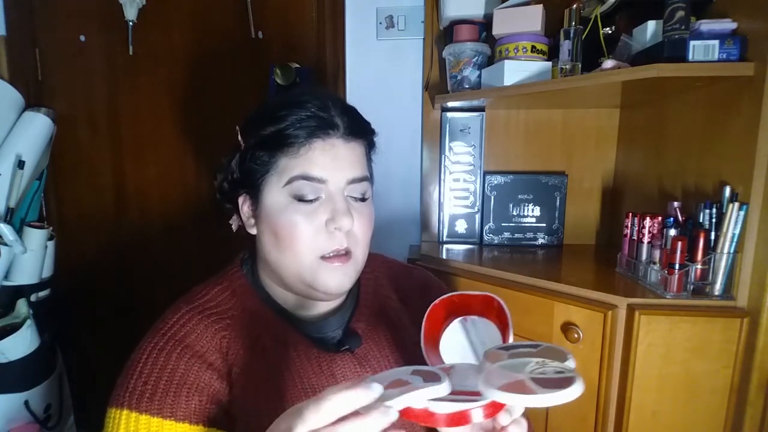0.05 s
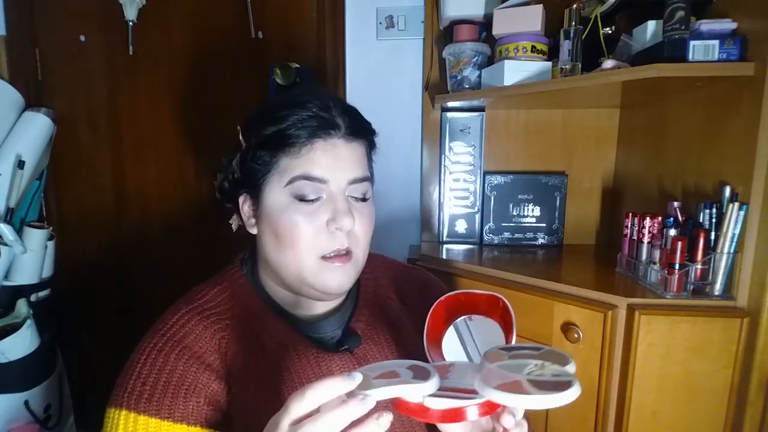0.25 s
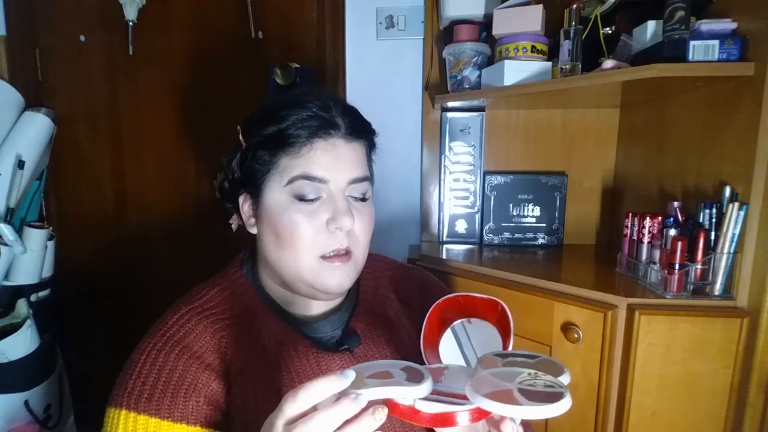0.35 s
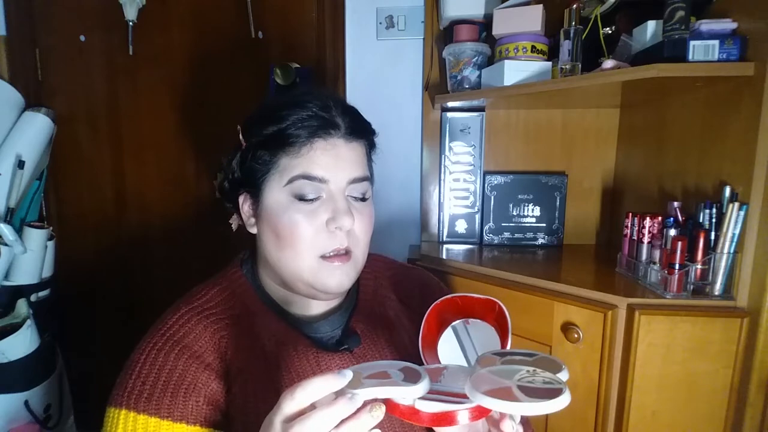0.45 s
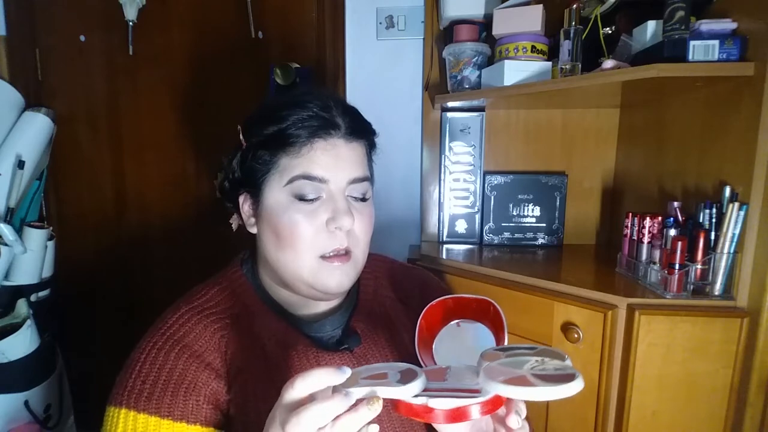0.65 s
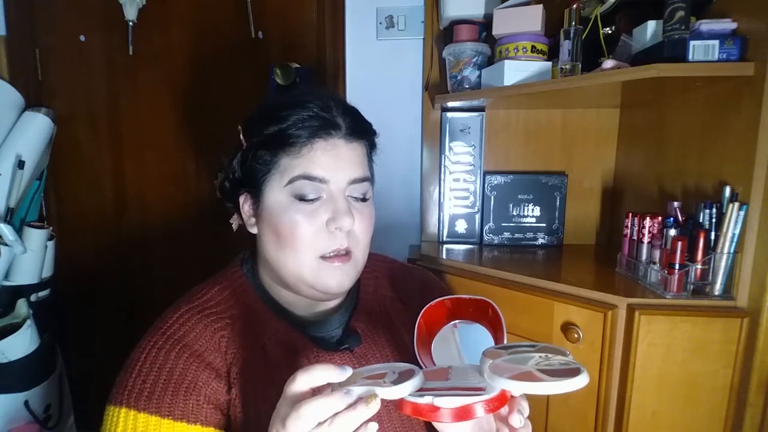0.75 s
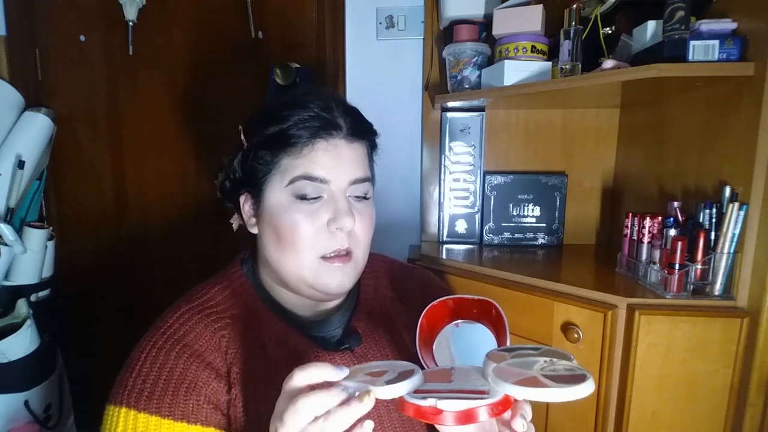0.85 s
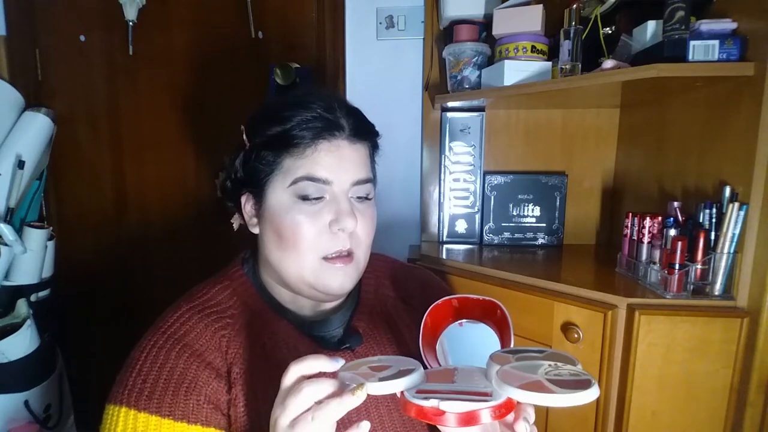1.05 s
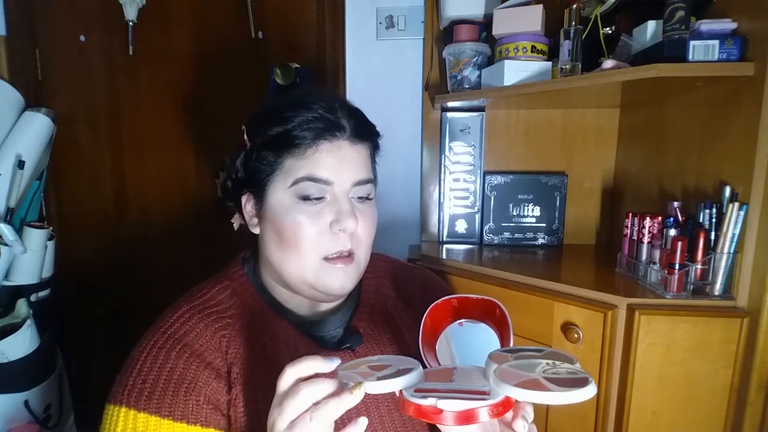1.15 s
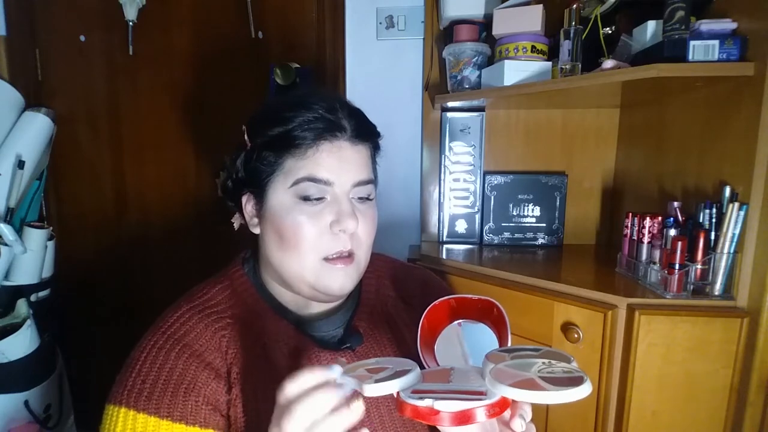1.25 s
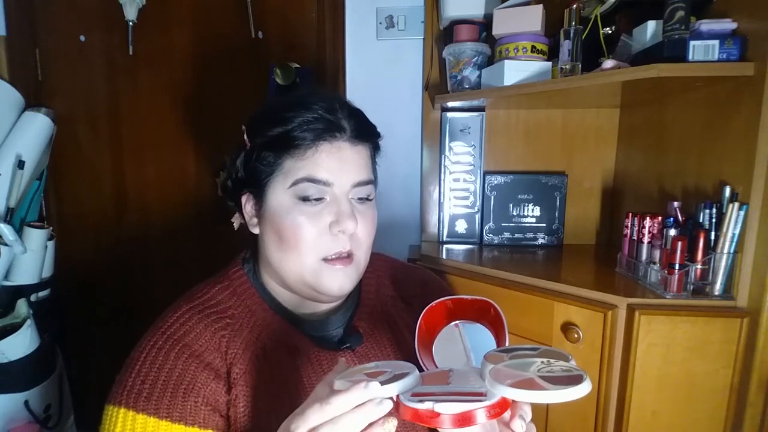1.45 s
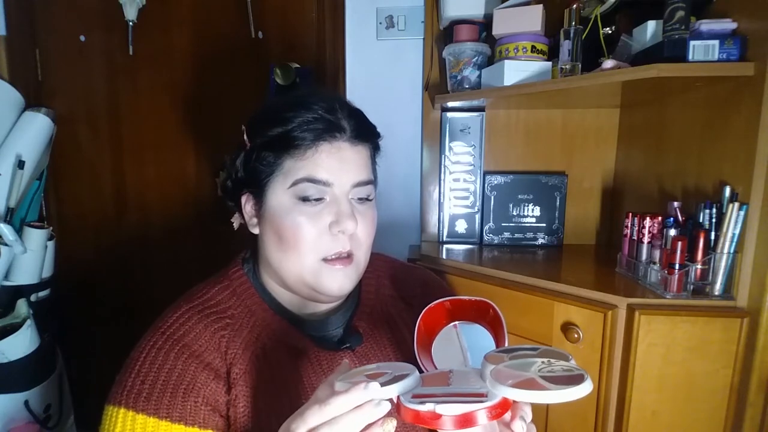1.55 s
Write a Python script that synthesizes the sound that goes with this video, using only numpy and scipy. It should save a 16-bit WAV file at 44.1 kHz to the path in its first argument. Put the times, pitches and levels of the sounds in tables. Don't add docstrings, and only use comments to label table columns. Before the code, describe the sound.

Fingers rub a hollow plastic compact, its tray catches and snaps hard with a short metallic buzz, followed by a run of muted knocks, a pause, and light ticks; close, dry indoor sound with quiet hiss.

```python
import sys
import numpy as np
from scipy import signal
from scipy.fft import rfft, irfft
from scipy.io import wavfile
from scipy.ndimage import uniform_filter1d

SR = 44100
rng = np.random.default_rng(int(sys.argv[2]) if len(sys.argv) > 2 else 0)


def master(y):
    cut = np.clip(np.atleast_2d(y).T, -1, 1)
    pcm = np.round(cut * 32767)
    wavfile.write(sys.argv[1], SR, pcm.astype(np.int16))


def amplitude_ratio(level_db):
    exponent = np.asarray(level_db, float) / 20
    return 10 ** exponent


N = 70560

# [f/Hz, level/dB]
AIR_TONE = [(100, -1.5), (300, -9.5), (1000, -14.5), (1400, -17.5), (3000, -24), (6500, -29.5),
            (9500, -28.5), (15800, -33.5)]
# [f/Hz, level/dB]
RUMBLE_SWELL = [(0.0, -79), (0.044, -61.5), (0.338, -60), (0.352, -69), (0.472, -55.5), (0.494, -65),
                (0.726, -55), (0.796, -68), (0.922, -64.5), (1.01, -71), (1.108, -62), (1.144, -71),
                (1.238, -64.5), (1.572, -65.5), (1.6, -60)]
RUMBLE_TONE = [(25, -25.5), (42, -22), (52, 3), (65, -2.5), (82, -2.5), (105, -19), (160, -51)]
# [f/Hz, level/dB]
RUB_SWELL = [(0, -59.5), (.09, -60), (.14, -60), (.2, -57.5), (.3, -53), (.4, -71), (.52, -64), (.62, -76),
             (.7, -71), (.8, -69), (.88, -65.5), (.95, -61), (1.02, -64), (1.1, -62.5), (1.17, -63),
             (1.22, -68.5), (1.4, -71), (1.6, -75.5)]
RUB_TONE = [(150, -16), (300, 2.5), (450, -0.5), (700, -5), (1000, -7), (1550, -9.5), (6000, -41.5)]
# [f/Hz, likeness 0..1]
LIKENESS = [(60, 0.97), (250, 0.92), (700, 0.89), (1650, 0.88), (4970, .4), (9000, .6), (15000, .7)]
# [t/s, level/dB]
CHATTER_SWELL = [(0, -75.5), (.4, -67), (.45, -71.5), (.53, -62.5), (.6, -67.5), (.63, -78), (.66, -60.5),
                 (.72, -70), (.78, -77), (.88, -74), (.95, -62.5), (1.0, -75), (1.1, -69.5), (1.2, -77),
                 (1.43, -74.5), (1.6, -83.5)]
# [f/Hz, level/dB]
SHIVER_RINGS = [(3300, -8), (4170, -7), (4790, -8.5)]
# [t/s, peak level/dB, pitch ratio, bright part level/dB, ring ratio]
KNOCKS = [(.069, -33.5, 0.94, -10, 0.73), (.437, -45, 0.91, -24, 1.04), (.444, -39, 0.91, -14, 0.34),
          (.4775, -36.5, 0.55, -22, 1.05), (0.502, -33.5, 1.03, -2.5, 0.65), (0.517, -47.5, 0.97, -7, 2.9),
          (0.549, -30, 1.02, -3.5, 0.89), (.577, -41, 0.71, 9.5, 0.39), (0.658, -47.5, 1.18, 4.5, 1.1),
          (0.667, -37.5, 1.04, -12, 1.3), (0.673, -55, 0.76, 12, 0.4), (0.680, -31.5, 0.95, -4, 0.74),
          (.695, -41, 1.03, -15, 0.58), (1.144, -45, 0.85, 1, 1.4), (1.150, -54, 0.88, 3, 0.9),
          (1.160, -46, 1.06, -6, 1.3), (1.170, -41.5, 0.56, -18, 1), (1.3675, -41, 0.93, -3, 0.91),
          (1.399, -38.5, 1.03, -6, 1.4), (1.4048, -33.5, 1.01, -16, 1.7)]
# [t/s, peak level/dB, pitch ratio, bright part level/dB]
SLIPS = [
    (0.2154, -17, 1.1, -4.5),
    (0.2186, -16.5, 1.02, -4),
    (0.2207, -26.5, 0.52, -10),
    (0.2244, -10.5, 1.103, -7.5),
    (0.2253, -20, 0.64, -7),
    (0.228, -23, 1.3, -6.5),
    (0.2342, -33, 0.94, -19.5),
    (0.241, -43, 0.65, -3.5),
]
# [level/dB, t60/s]
BODY_HZ = [180, 585, 780, 938, 1090, 1218, 1372, 1640]
BODY_MODES = [(-30, .02), (-26, .021), (-12.5, .024), (0, .017), (-20, .04), (-8, .014), (-17, .023),
              (-30, .035)]
# [level/dB, t60/s]
WALL_HZ = [1900, 2350, 2520, 2970, 3320, 3570, 4220, 4740, 5600, 6300, 8600, 9350, 10400]
WALL_MODES = [(-32, 0.016), (-33, 0.034), (-33.5, 0.054), (-40.5, 0.048), (-36.5, 0.032), (-44, 0.021),
              (-51.5, 0.013), (-47.5, 0.021), (-60.5, 0.028), (-51.5, 0.025), (-46.5, 0.015),
              (-55.5, 0.018), (-43, .012)]
# [f/Hz, level/dB]
CRACK_TONE = [(1500, 5.5), (3000, 9.5), (5000, -3.5), (7200, -20.5), (9500, -5.5), (11500, -27),
              (15500, -26)]
# [t/s, level/dB]
SWISH_SWELL = [(0, -89), (.12, -80.5), (.17, -72.5), (.24, -75), (.34, -99), (.5, -83.5), (.58, -82),
               (.75, -83.5), (1.6, -95.5)]
# [f/Hz, level/dB]
CREAK_TOPS = [(1990, -12.5), (2890, -14.5), (4240, -17)]
# [t/s, peak level/dB, f/Hz, t60/s]
PINGS = [(.2175, -33.5, 596, 0.057), (.2235, -34.5, 590, 0.034), (0.4781, -48, 916, 0.023),
         (.5015, -51, 1570, 0.019), (.5015, -64, 2300, .015), (0.548, -43, 1595, 0.019),
         (.549, -53, 2220, 0.017), (.549, -61, 2530, 0.028), (0.547, -66, 4420, 0.037),
         (.548, -69, 4670, 0.03), (.548, -68, 5630, .025), (0.5762, -67, 3220, .015),
         (0.577, -67, 4180, 0.017), (0.667, -60, 1648, 0.067), (.668, -63, 2560, .035),
         (.669, -66, 3240, 0.039), (.669, -69, 4120, 0.046), (.669, -73, 4660, 0.022),
         (.668, -69, 2170, 0.027), (1.142, -66.5, 3280, 0.027), (1.142, -65.5, 2250, .03),
         (1.142, -77, 4150, .03), (1.158, -66.5, 4460, 0.024), (1.145, -59, 1350, .04),
         (1.367, -69, 4160, 0.035), (1.366, -64, 3410, .02), (1.394, -62.5, 3290, 0.048),
         (1.395, -60, 4160, 0.046), (1.398, -62.5, 4720, 0.041), (1.395, -62, 5540, 0.044),
         (1.398, -60.5, 1758, 0.054), (1.401, -57.5, 1387, 0.038), (1.406, -45, 768.5, 0.049),
         (0.306, -62.5, 4200, .06), (.312, -68, 4800, .05), (.381, -77, 4190, 0.035),
         (.296, -51.5, 2525, 0.076)]
# [t/s, level/dB, length/s, lower part level/dB]
TICKS = [(.2185, -60, .008, 11), (.225, -60.5, .005, 10), (0.29, -68.5, 0.041, -7), (0.31, -58, 0.0084, 6),
         (0.385, -61.5, 0.0085, 7), (0.544, -60.5, 0.0054, -2), (0.57, -65, 0.0051, 4),
         (0.669, -65.5, 0.0079, 11.5), (0.83, -72.5, 0.0054, 12.5), (1.143, -60, 0.0063, 4),
         (1.157, -51.5, 0.012, -5), (1.173, -62, 0.0083, -15), (1.186, -60, 0.0066, -4),
         (1.363, -66.5, 0.029, -1.5), (1.369, -68, 0.0065, -4), (1.393, -51.5, 0.013, -9.5),
         (1.399, -41.5, 0.0061, -17)]
# [f/Hz, level/dB]
TICK_TONE = [(500, -11), (2000, -6.5), (4500, -12), (7000, -19), (9400, -15), (11000, -15), (15500, -35)]
# [f/Hz, level/dB]
JINGLE = [(3350, -8.5), (4180, -10), (4740, -12), (5500, -13), (8650, -4.5), (9350, -2), (10300, -6)]
PAN_HZ = [2345, 2535]
PAN_LEVELS = [-61, -54]
# [f/Hz, t60/s]
ROOM_DECAY = [(150, 0.71), (400, 0.08), (1000, 0.17), (2500, 0.12), (5000, 0.12), (10000, 0.06)]
# [f/Hz, left minus right level/dB]
LEAN = [(1500, 0.5), (2400, 2), (4400, -8), (6200, -9.5), (8100, 9), (10000, 5.5), (14000, -2)]

SNAP_S, SNAP_DB = 0.24355, 4.5
HELD_DB = -7.5


def evened(x):
    return x / np.sqrt(np.mean(x ** 2) + 1e-20)


def read(points, hz):
    f, value = np.transpose(points)
    return np.interp(np.log(hz + 1), np.log(f + 1), value)


def along(points):
    return np.interp(np.arange(N) / SR, *np.transpose(points))


def add(mix, s, sound):
    part = mix[round(s * SR):][:len(sound)]
    part += sound[:len(part)]


def colour(x, points, slope_db=-30):
    hz = np.fft.rfftfreq(x.shape[-1], 1 / SR) + 1
    below = np.maximum(np.log2(points[0][0] / hz), 0)
    above = np.maximum(np.log2(hz / points[-1][0]), 0)
    return irfft(rfft(x) * amplitude_ratio(read(points, hz) + slope_db * (below + above)), x.shape[-1])


def resonate(x, hz, width):
    turn = np.exp(2j * np.pi * np.cumsum(hz * np.ones(len(x))) / SR)
    r = np.exp(-np.pi * width / SR)
    return evened((turn * signal.lfilter([1], [1, -2 * r, r * r], x / turn)).real)


def pair(x, y):
    same = np.clip(read(LIKENESS, np.fft.rfftfreq(N, 1 / SR)), 0, 1)
    middle = np.sqrt((1 + same) / 2) * rfft(x)
    side = np.sqrt((1 - same) / 2) * rfft(y)
    return irfft(np.array([middle + side, middle - side]), N)


def background():
    noise = rng.standard_normal((5, N))
    t = np.arange(N) / SR
    air = amplitude_ratio(-70) * pair(*evened(colour(noise[:2], AIR_TONE)))
    low = evened(colour(noise[2:4], RUMBLE_TONE))
    low = low / (abs(signal.hilbert(low[0])) + 0.59)
    rumble = amplitude_ratio(along(RUMBLE_SWELL) + 3.5) * pair(*low)
    drone_hz = np.maximum(351 - 200 * t, 280)
    drone = amplitude_ratio(-54.5 - 60 * t / 0.4) * resonate(noise[4], drone_hz, 49)
    return air + rumble + drone


def rub():
    grains_per_s, grain_db = 900, -1.5
    hits = rng.random((2, N)) < grains_per_s / SR
    sizes = amplitude_ratio(grain_db * np.minimum(rng.exponential(1, (2, N)), 4))
    grains = hits * sizes * rng.standard_normal((2, N))
    x = colour(evened(grains) + 1.4 * rng.standard_normal((2, N)), RUB_TONE)
    return amplitude_ratio(along(RUB_SWELL) - 1) * pair(*evened(x))


def chatter():
    t = np.arange(N) / SR
    nudges_per_s, shiver_db, shiver_t60, shiver_end_s = 900, -54.5, 0.28, 0.325
    nudges = (rng.random(N) < nudges_per_s / SR) * rng.standard_normal(N)
    rubbed_shell = amplitude_ratio(along(CHATTER_SWELL)) * resonate(nudges, 930, 220)
    shiver = (t > SNAP_S) * amplitude_ratio(shiver_db - 60 * abs(t - SNAP_S) / shiver_t60)
    shiver = shiver * np.clip((shiver_end_s - t) / 0.008, 0, 1)
    grit = (rng.random(N) < 0.08) * rng.standard_normal(N)
    rings = sum(amplitude_ratio(db) * resonate(grit, hz, 120) for hz, db in SHIVER_RINGS)
    return rubbed_shell + shiver * (resonate(grit, 3820, 1700) + rings)


def knock(level_db, ratio, bright_db, ring, lid_db, phases, crack):
    t = np.arange(5000) / SR
    lid_from_hz = 1.01 * BODY_HZ[3]
    body = np.zeros(len(t))
    for hz, (db, t60) in zip(BODY_HZ, BODY_MODES):
        swing = np.sign(hz - lid_from_hz)
        level = db + lid_db * (hz > lid_from_hz)
        body += swing * amplitude_ratio(level - 60 * t / (t60 * ring)) * np.sin(2 * np.pi * hz * ratio * t)
    body = body * (1 - np.exp(-t / (0.003 * ring)))
    walls = amplitude_ratio(-31.5) * crack * np.exp(-t / 0.0039)
    for hz, (db, t60), phase in zip(WALL_HZ, WALL_MODES, phases):
        walls += amplitude_ratio(db - 60 * t / (t60 * ring)) * np.sin(2 * np.pi * (hz * t + phase))
    return amplitude_ratio(level_db) * (body + amplitude_ratio(bright_db) * walls * (1 - np.exp(-t / 0.0008)))


def knocks():
    out = np.zeros(N)
    slip_ring = 1.05
    rows = [(SNAP_S, SNAP_DB, 1, 0, 1, 0)]
    rows += [tuple(row) + (slip_ring, HELD_DB / 2) for row in SLIPS]
    rows += [tuple(row) + (HELD_DB,) for row in KNOCKS]
    cracks = evened(colour(rng.standard_normal((40, 5000)), CRACK_TONE))
    all_phases = rng.random((40, len(WALL_HZ)))
    for (s, *rest), phases, crack in zip(rows, all_phases, cracks):
        add(out, s, knock(*rest, phases, crack))
    return signal.sosfilt(signal.butter(2, 150, "high", fs=SR, output="sos"), out)


def swish(white):
    hiss = evened(colour(white, TICK_TONE))
    return (hiss + 0.36 * resonate(white, 9710, 1900)) * amplitude_ratio(along(SWISH_SWELL))


def creak(white):
    creak_s, length_s = 0.16, 0.032
    swell = amplitude_ratio(-62) * np.exp(-((np.arange(N) / SR - creak_s) / length_s) ** 2)
    tops = sum(amplitude_ratio(db) * resonate(white, hz, 110) for hz, db in CREAK_TOPS)
    return swell * (resonate(white, 1070, 70) + tops)


def pings():
    out, t = np.zeros(N), np.arange(6000) / SR
    for s, db, hz, t60 in PINGS:
        shape = amplitude_ratio(db - 60 * t / max(t60, 0.005)) * (1 - np.exp(-t / 0.0024))
        add(out, s, shape * 1.4 * np.sin(2 * np.pi * hz * t))
    return out * (1 + 0.5 * evened(uniform_filter1d(rng.standard_normal(N), size=70)))


def ticks(white):
    jingle = evened(sum(amplitude_ratio(db) * resonate(white, hz, 380) for hz, db in JINGLE))
    hiss = evened(colour(white, TICK_TONE))
    jingle_share = 0.41
    tone = (1 - jingle_share) * hiss + jingle_share * jingle
    low = signal.sosfiltfilt(signal.butter(4, 7000, fs=SR, output="sos"), tone)
    high_swell, low_swell = np.zeros((2, N))
    u = np.arange(4000) / SR
    for s, db, length, low_db in TICKS:
        shape = amplitude_ratio(db) * (u / length) * np.exp(1 - 2.88 * u / length) * 1.4
        add(high_swell, s - 0.34 * length, shape)
        add(low_swell, s - 0.29 * length, shape * amplitude_ratio(low_db))
    return (tone - low) * high_swell + low * low_swell


def pans():
    t = np.arange(N) / SR - SNAP_S
    decay = (t > 0) * amplitude_ratio(-60 * abs(t) / 0.32)
    return decay * sum(amplitude_ratio(db) * resonate(rng.standard_normal(N), hz, 90) for hz, db in zip(PAN_HZ, PAN_LEVELS))


def room(x):
    wide, gap_s = 0.17, 0.011
    taps = np.zeros((2, SR // 2))
    at = np.arange(0, SR // 2 - 20, 20)
    at = at + rng.integers(0, 20, (2, len(at)))
    np.put_along_axis(taps, at, rng.choice([-1., 1.], at.shape), 1)
    side = wide * np.gradient(taps[1])
    taps = np.array([taps[0] + side, taps[0] - side])
    hz, t, z = signal.stft(taps, SR, nperseg=256)
    t60 = np.maximum(read(ROOM_DECAY, hz), 0.02)[:, None]
    tail = signal.istft(z * amplitude_ratio(-60 * t / t60), SR, nperseg=256)[1]
    tail = np.pad(tail / np.linalg.norm(tail[0]), ((0, 0), (round(gap_s * SR), 0)))
    return amplitude_ratio(-16) * signal.fftconvolve(x[None], tail, axes=1)[:, :N]


def scene():
    struck = knocks()
    white = rng.standard_normal(N)
    case = struck + swish(white) + creak(white) + ticks(white) + pans()
    wet = room(case)
    beds = rub() + background()
    near = case + wet + chatter() + pings()
    lean = read(LEAN, np.fft.rfftfreq(N, 1 / SR)) / 2
    return irfft(rfft(near) * amplitude_ratio(np.array([lean, -lean])), N) + beds


def top_cut(x):
    return signal.sosfilt(signal.butter(12, 16410, fs=SR, output="sos"), x)


def record(dry):
    return top_cut(dry)


dry = scene()
out = record(dry)
master(out)
```